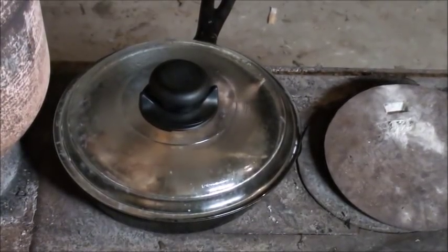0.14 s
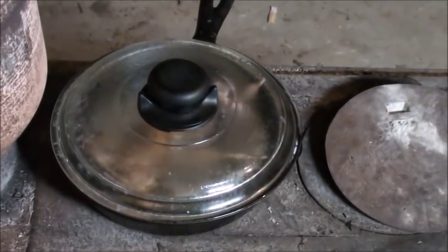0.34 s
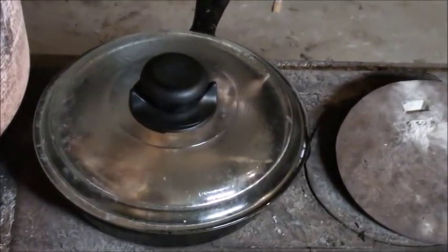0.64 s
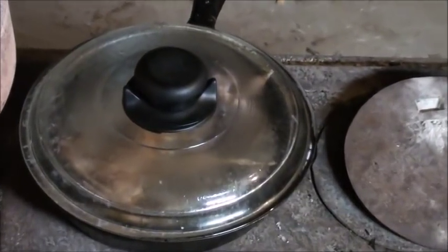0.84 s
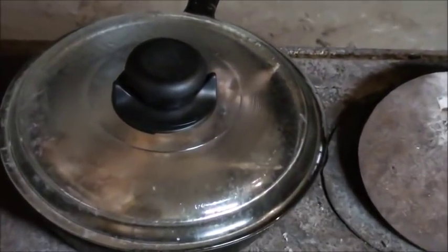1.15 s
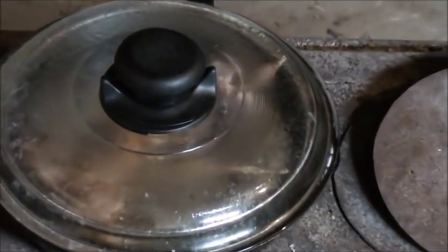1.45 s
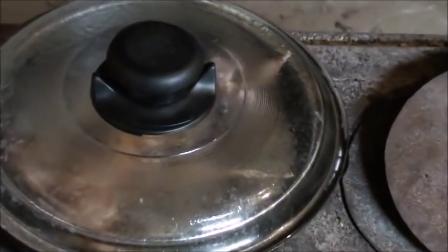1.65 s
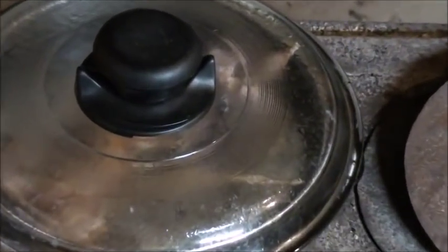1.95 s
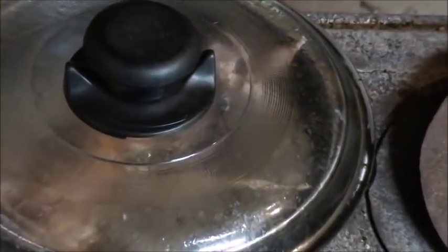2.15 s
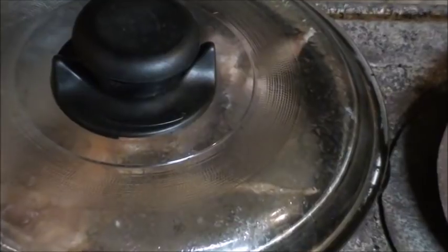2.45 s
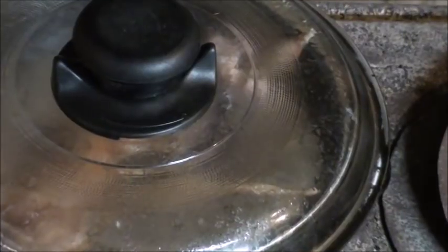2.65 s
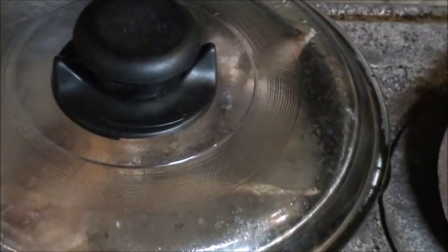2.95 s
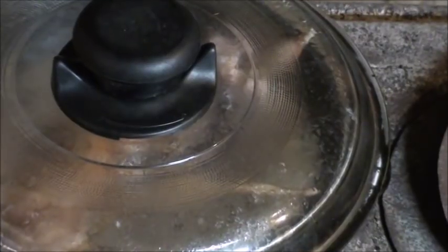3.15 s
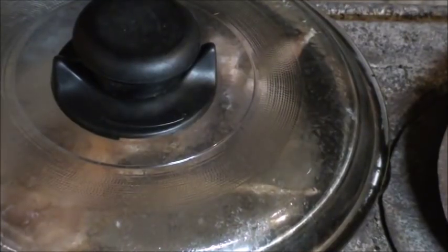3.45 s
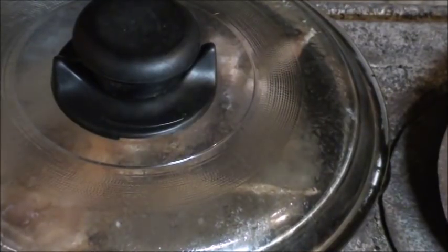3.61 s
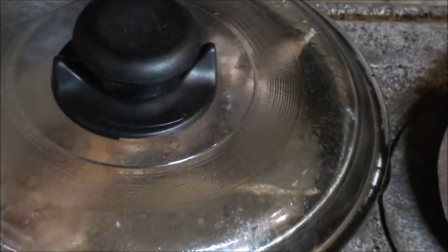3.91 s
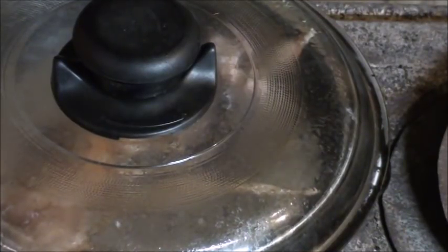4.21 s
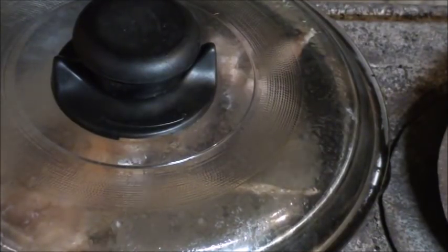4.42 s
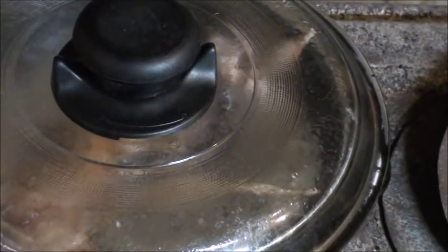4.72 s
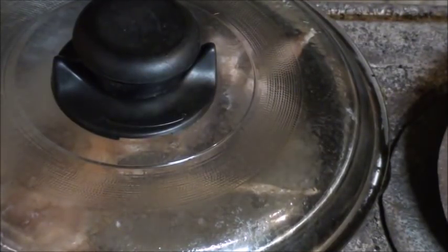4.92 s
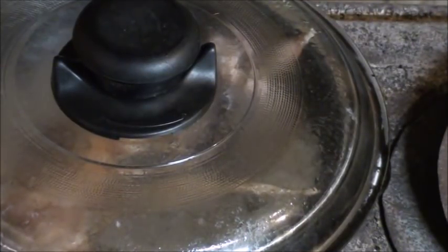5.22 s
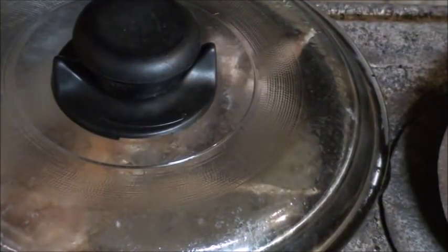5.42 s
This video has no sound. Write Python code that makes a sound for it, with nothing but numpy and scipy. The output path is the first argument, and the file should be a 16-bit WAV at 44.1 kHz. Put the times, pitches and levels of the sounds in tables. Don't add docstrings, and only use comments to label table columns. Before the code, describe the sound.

Hot fat crackles continuously beneath a glass lid, thousands of tiny bursts forming a rough, bright hiss. Early bubbles plop and ring hollowly; isolated spits pop sharply. The boil dips after one second, flares again around one and a half, peaks near three, then calms. Close, narrow stereo pickup in a quiet kitchen.

```python
import sys
import numpy as np
from scipy import signal
from scipy.fft import rfft, irfft, next_fast_len
from scipy.io import wavfile
from scipy.ndimage import map_coordinates

SR = 44100
rng = np.random.default_rng(int(sys.argv[2]) if len(sys.argv) > 2 else 0)


def gain_from_db(level_db):
    decades = np.asarray(level_db, float) / 20
    return 10 ** decades


def log_audio(samples):
    frames = np.atleast_2d(samples).T
    limited = np.clip(frames, -1, 1)
    pcm = np.round(limited * 32767).astype(np.int16)
    wavfile.write(sys.argv[1], SR, pcm)


N = 245637

# pitch_hz, density_db (per Hz)
KITCHEN_TONE = [(25, -77), (50, -71), (60, -63), (72, -76), (93, -58), (130, -65.5), (200, -63), (600, -72),
                (1000, -71), (2000, -74.5), (4000, -63)]
# pitch_hz, density_db (per Hz)
PORT_HISS = [(60, -109), (200, -74), (1300, -71.5), (2500, -85), (6000, -67)]
# pitch_hz, level_db
PORT_WIDTH = [(60, -26), (200, -18), (1400, -18), (2400, -13), (3300, -14), (4200, -24), (5000, -23),
              (6200, -21), (7500, -18), (8500, -17), (9400, -18), (9900, -34), (14000, -50)]
# pitch_hz, left_over_right_db
PORT_LEAN = [(1000, 0), (2500, .2), (4500, .3), (6000, 1), (9300, .9), (9800, 0)]
# pitch_hz, density_db (per Hz)
RIM_STEAM = [(350, -36), (600, -3.5), (800, -0.5), (1100, -2.5), (1700, -10)]
# pitch_hz, width_hz, level_db
PAN_MODES = [(205, 35, -7), (275, 30, -5), (303, 34, 0), (338, 24, -4), (385, 26, -6), (472, 26, -7),
             (900, 80, -11)]
# pitch_hz, width_hz, level_db
LOWER_AIR_MODES = [(1040, 28, -19.5), (1200, 92, -23), (1368.8, 23, 2.5), (1410, 51, -12)]
UPPER_AIR_MODES = [(1530, 42, -7), (1542, 85, 2), (1560, 60, -5)]
# pitch_hz, width_hz, boost_db
LID_MODES = [(2135, 18, 4), (2275, 16, 7), (2328, 24, 9), (2378, 36, 6), (2430, 36, 8), (2600, 200, -2),
             (3135, 30, 6), (3242, 28, 6), (3322, 28, 3), (3425, 48, 4), (3620, 250, -4), (3970, 60, 4),
             (4235, 200, 5), (4440, 70, 3), (4540, 140, -4), (4945, 80, 3), (5344, 60, 3), (6170, 150, 2),
             (6900, 500, 2), (7487, 60, 3), (9300, 500, 3)]
# pitch_hz, density_db (per Hz)
FAT_COLOUR = [(1060, -56), (1800, -21.5), (2360, -14.5), (2660, -15), (3150, -7), (3650, -6.5),
              (4110, -4.5), (5430, -4), (6860, 0), (8500, -6.5), (11000, -38), (18700, -120)]
# pitch_hz, density_db (per Hz)
SPRAY_COLOUR = [(4590, -14.5), (7800, -3), (8380, -6), (9380, -0.5), (10300, -3), (13000, -17.5),
                (15500, -25.5)]
# start_s, peak_db, pitch_hz, t60_s
PLOPS = [(.12, -24, 1350, .12), (.172, -31, 325, .08), (.2, -30, 290, .07), (.29, -26, 1365, .08),
         (.4, -28, 1370, .05), (.46, -26, 1365, .08), (.58, -27, 1365, .06), (.697, -30, 340, .04),
         (1.0, -26, 1365, .09), (1.585, -27, 1365, .07), (1.1, -34, 300, .07), (2.371, -25, 1380, .05),
         (2.372, -27, 2380, .06), (2.373, -30, 2600, .03), (2.51, -29, 2350, .04), (2.548, -24, 1520, .035),
         (2.578, -27, 960, .035), (2.581, -28, 1140, .035), (4.015, -25, 1400, .05),
         (4.014, -27, 2330, .04), (4.024, -27, 270, .035), (4.024, -26, 420, .025), (4.024, -27, 560, .02)]
# start_s, peak_db, pitch_hz
LOUD_SPITS = [(.0854, -3, 9600), (.1444, -9, 6700), (.237, -4, 6100), (.2697, -4, 6700), (.3447, -5, 6500),
              (.4826, -6, 6300), (.7343, -7, 7200), (.7912, -7, 6400), (.8924, -4, 7100), (.9519, -5, 6700),
              (1.1216, -6, 5500), (1.2947, -6, 7500), (1.3339, -5, 6600), (1.3962, -6, 7600),
              (1.4646, -6, 6400), (1.5785, -3, 6600), (1.6007, -4, 6900), (1.7199, -8, 4200),
              (1.9593, -6, 4300), (2.0049, -5, 7300), (2.2619, -6, 6800), (2.3521, -5, 6800),
              (2.4827, -5, 7400), (2.8294, -4, 6500), (2.9661, -4, 4200), (3.1124, -4, 6800),
              (3.3889, -4, 7200), (3.4708, -6, 5900), (4.5764, -7, 6000), (5.2129, -6, 6900)]
# time_s, level_db
BOIL = [
    (0, 0.5),
    (.7, -0.5),
    (1.3, -1),
    (2.1, 0),
    (3.1, 1.5),
    (3.9, .5),
    (4.5, -1),
    (5.57, -2),
]
# peak_s, level_db, fade_s
FLARES = [
    (.12, 5.5, .24),
    (.38, 2.5, 0.037),
    (1.46, 3, 0.069),
    (1.59, 5, 0.11),
    (1.93, 2, 0.18),
    (2.72, 3.5, 0.22),
    (3.2, 1, 0.22),
    (4.1, 1.5, 0.11),
    (5.16, 2, 0.068),
]
# peak_s, lower_mode_db, upper_mode_db
GULPS = [(.14, 9, -2), (.3, 9, 0), (.44, 5.5, 2), (.7, -2, 5.5), (.81, 3, 0), (1.27, -6, -2.5),
         (1.58, 5.5, 2), (1.72, 5, -1), (2.36, 7.5, 3.5), (2.56, -4, 4), (2.67, 5.5, -1), (2.86, 5.5, 1),
         (2.99, -5, 6.5), (3.17, 5, 3.5), (3.35, -3, 7.5), (3.64, 5, 3.5), (3.83, 7, -1.5), (4.01, 4, -1),
         (4.31, 4.5, 0), (5.0, 1.5, 0), (5.45, 4, 5)]
# peak_s, level_db
CRACKLES = [
    (.15, 2.5),
    (1.95, 4),
    (2.76, -0.5),
    (3.8, 1),
]
# peak_s, level_db, half_length_s
SIMMERS = [
    (0.06, 7, .12),
    (0.193, 7, 0.053),
    (0.34, 4, .1),
    (1.104, 2.5, 0.039),
    (2.73, 4.5, 0.061),
    (2.984, 2.5, 0.064),
    (4.233, 4.5, .05),
]

# level_db, db_per_boil_db, db_per_flare_db, drying_db_per_s
MIDDLE_BUBBLES = (-21, 1.12, .5, -0.08)
LARGE_BUBBLES = (-27, 1.3, 0.17, 0.3)
FINE_SPRAY = (-25, 1.16, 1.02, -.45)
LOWER_AIR = (-37.5, 0.76, -0.32, 0.04)
UPPER_AIR = (-39, 2, 0.15, 0.06)
SIMMERING = (-40, 0.6, 0.16, -0.07)
STEAM = (-48.5, 1.1, .7, -1.12)


def unit(x):
    return x / np.sqrt(np.mean(x ** 2) + 1e-20)


def along(points, hz):
    f, v = np.transpose(points)
    return np.interp(np.log(hz + 1), np.log(f + 1), v)


def wobble(rate):
    knots = rng.standard_normal(int(N * rate / SR) + 4)
    return map_coordinates(knots, [np.arange(N) * rate / SR])


def filtered(x, response):
    m = 2 * next_fast_len(N // 2 + SR // 4)
    spectrum = rfft(x, m) * response(np.fft.rfftfreq(m, 1 / SR))
    return irfft(spectrum, m)[..., :N]


def causal(gain):
    cepstrum = irfft(np.log(gain + 1e-6))
    half = len(cepstrum) // 2
    cepstrum[1:half] *= 2
    cepstrum[half + 1:] = 0
    return np.exp(rfft(cepstrum))


def mode(f, hz, width):
    return 1j * f * width / (hz * hz - f * f + 1j * f * width)


def ringing(f, modes, hz, width):
    power = sum(abs(gain_from_db(db) * mode(f, c, w)) ** 2 for c, w, db in modes)
    return causal(np.sqrt(power)) * mode(f, hz, width)


def hiss(spectrum):
    closed = spectrum + [(20000, -120)]
    return filtered(rng.standard_normal(N), lambda f: gain_from_db(along(closed, f)) * np.sqrt(SR / 2))


def swells(times, heights_db, fades, rise=1):
    t = np.arange(0, N, 64) / SR
    late = t - np.asarray(times)[:, None]
    width = np.broadcast_to(fades, len(times))[:, None] * np.where(late < 0, rise, 1)
    heights = np.asarray(heights_db) @ np.exp(-(late / width) ** 2)
    return np.interp(np.arange(N) / SR, t, heights)


def levels():
    t = np.arange(N) / SR
    boil = np.interp(t, *np.transpose(BOIL))
    flare = swells(*np.transpose(FLARES), rise=.6)
    gulp_s, lower_db, upper_db = np.transpose(GULPS)

    def layer(settings, extra_db=0):
        db, per_boil, per_flare, drying = settings
        return db + per_boil * boil + per_flare * flare + drying * t + extra_db

    return (layer(MIDDLE_BUBBLES),
            layer(LARGE_BUBBLES, swells(*np.transpose(CRACKLES), fades=0.032)),
            layer(FINE_SPRAY),
            layer(LOWER_AIR, swells(gulp_s, lower_db, fades=0.055)),
            layer(UPPER_AIR, swells(gulp_s, upper_db, fades=0.055)),
            layer(SIMMERING, swells(*np.transpose(SIMMERS))),
            layer(STEAM))


def bursts(share, spread_db, clump):
    chance, size, sign = rng.random((3, N))
    height = gain_from_db(-spread_db * np.log(1.004 - size))
    return unit((chance < share) * height * np.sign(sign - .5) * clump)


def bubbles(sizes_hz, sharp, share, spread_db, clump, own_db):
    out = 0
    for hz in sizes_hz:
        own_surge = gain_from_db(own_db * (0.53 * wobble(18) + 0.65 * wobble(150)))
        clicks = bursts(share, spread_db, clump * own_surge)
        out = out + filtered(clicks, lambda f: mode(f, hz, hz / sharp))
    return out


def kitchen():
    level = gain_from_db(-49 + 3.2 * wobble(4.04))
    hum = level * np.sin(2 * np.pi * 412 * np.arange(N) / SR + 0.5 * wobble(5.17))
    return gain_from_db(-8.0) * hiss(KITCHEN_TONE) + hum


def rim_steam(steam_db):
    return gain_from_db(steam_db + 1.2 * wobble(9)) * unit(hiss([(20, -90)] + RIM_STEAM))


def simmering_juice(surge, simmer_db):
    gurgle = bursts(.012, 1.06, gain_from_db(0.73 * surge + 0.21 * wobble(11)))
    juice = filtered(gurgle, lambda f: ringing(f, PAN_MODES, 390, 640))
    return gain_from_db(simmer_db - 1.24) * unit(juice)


def air_under_lid(surge, lower_db, upper_db):
    def thuds():
        return bursts(.03, 2.2, gain_from_db(0.78 * surge + 0.43 * wobble(13)))

    lower = filtered(thuds(), lambda f: ringing(f, LOWER_AIR_MODES, 1340, 570))
    upper = filtered(thuds(), lambda f: ringing(f, UPPER_AIR_MODES, 1355, 620))
    return gain_from_db(lower_db + 0.35) * unit(lower) + gain_from_db(upper_db + 0.5) * unit(upper)


def plops():
    out, t = np.zeros(N + SR), np.arange(SR // 8) / SR
    for s, db, hz, t60 in PLOPS:
        ring = np.sin(2 * np.pi * hz * t * (1 + 0.085 * t / t60))
        onset = 1 - np.exp(-t / 0.0013)
        out[round(s * SR):][:len(t)] += gain_from_db(db + 5.5 - 60 * t / t60) * onset * ring
    return out[:N]


def spits():
    out, t = np.zeros(N + SR), np.arange(SR // 100) / SR
    small = rng.random((30, 3)) * [N / SR, -3, .4 * 6500] + [0, -7, .8 * 6500]
    for s, db, hz in LOUD_SPITS + list(small):
        ring = np.sin(2 * np.pi * hz * t) + .5 * rng.standard_normal(len(t))
        onset = 1 - np.exp(-t / .0001)
        out[round(s * SR):][:len(t)] += gain_from_db(db + 2.5 - 60 * t / .0045) * onset * ring
    return filtered(out[:N], lambda f: mode(f, 6000, 9000) ** 2 * causal(1 / (1 + (f / 11500) ** 12)))


def lid_gain(f):
    return gain_from_db(sum(db * abs(mode(f, hz, w)) ** 2 for hz, w, db in LID_MODES))


def fine_spray(surge, spray_db):
    fine = bubbles(np.geomspace(8000, 15000, num=4), sharp=3.7, share=.15, spread_db=3.5,
                   clump=gain_from_db(1.2 * surge), own_db=1.5)
    fine = filtered(fine, lambda f: causal(gain_from_db(along(SPRAY_COLOUR, f)) * lid_gain(f)))
    return gain_from_db(spray_db) * unit(fine)


def frying_fat(surge, middle_db, large_db):
    large = bubbles([2300, 3200, 4200], sharp=3.2, share=.06, spread_db=2.5,
                    clump=gain_from_db(surge), own_db=2.1)
    middle = bubbles([5300, 6600, 8100], sharp=2.43, share=.12, spread_db=1.5,
                     clump=gain_from_db(surge), own_db=1.42)
    size_db = large_db - middle_db
    coarse = gain_from_db(size_db - size_db.mean()) * large + gain_from_db(-0.8) * middle
    coarse = filtered(coarse, lambda f: causal(gain_from_db(along(FAT_COLOUR, f)) * lid_gain(f)))
    return gain_from_db(middle_db + 1.17) * unit(coarse)


def sizzle():
    middle_db, large_db, spray_db, lower_db, upper_db, simmer_db, steam_db = levels()
    surge = 0.2 * wobble(14) + 0.44 * wobble(45) + 0.67 * wobble(600)
    return (rim_steam(steam_db) + simmering_juice(surge, simmer_db)
            + air_under_lid(surge, lower_db, upper_db)
            + fine_spray(surge, spray_db) + frying_fat(surge, middle_db, large_db))


def scattered(x):
    z = signal.stft(x, nperseg=1024)[2]
    turned = z * np.exp(2j * np.pi * rng.random(z.shape))
    return signal.istft(turned, nperseg=1024)[1][:N]


def microphone_ports(mid, pan):
    side = filtered(scattered(pan), lambda f: gain_from_db(along(PORT_WIDTH, f) + 3))
    side += gain_from_db(-8) * hiss(PORT_HISS)
    ports = np.array([mid + side, mid - side])
    return filtered(ports, lambda f: gain_from_db(along(PORT_LEAN, f) / 2 * np.array([[1], [-1]])))


def scene():
    pan = plops() + spits() + sizzle()
    return microphone_ports(kitchen() + pan, pan)


def low_pass(x):
    return signal.sosfilt(signal.butter(12, 15740, fs=SR, output="sos"), x)


def record(dry):
    return low_pass(dry)


dry = scene()
out = record(dry)
log_audio(out)
```